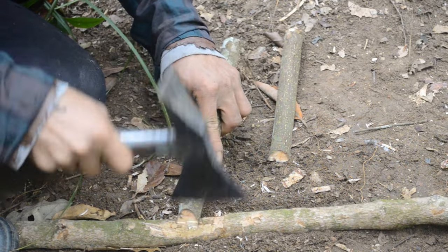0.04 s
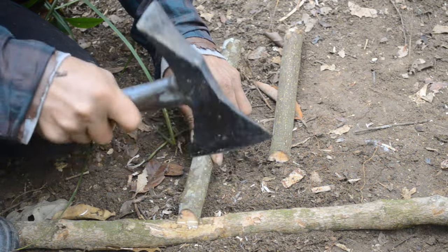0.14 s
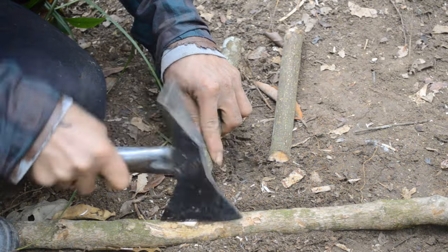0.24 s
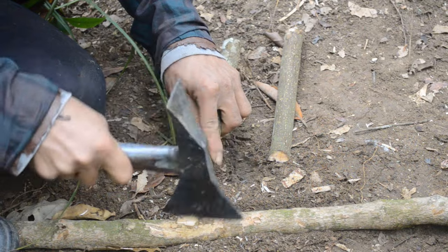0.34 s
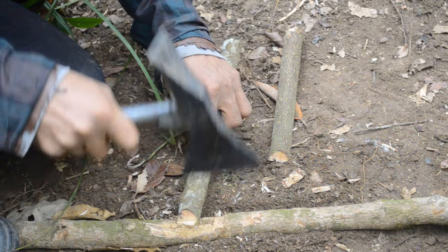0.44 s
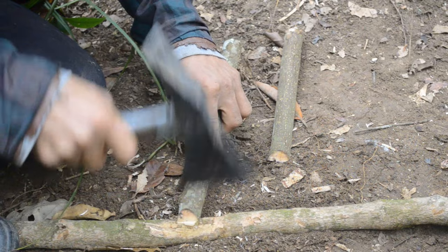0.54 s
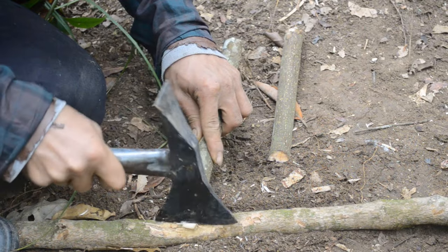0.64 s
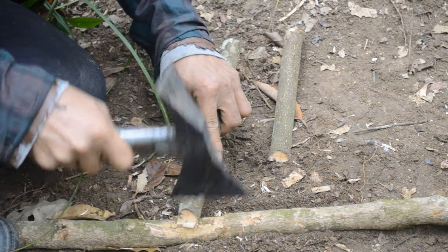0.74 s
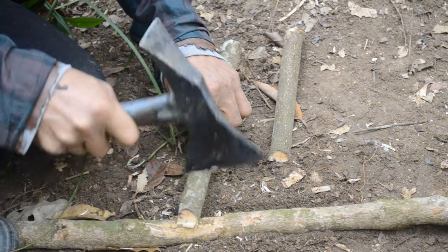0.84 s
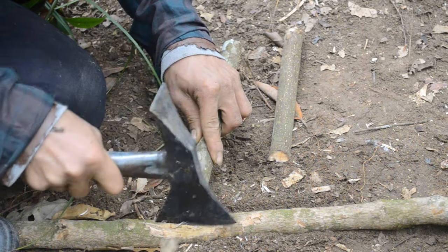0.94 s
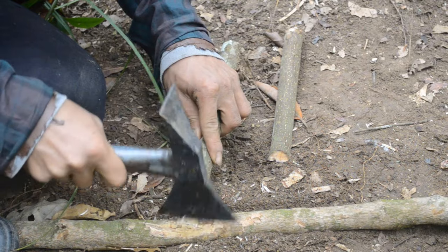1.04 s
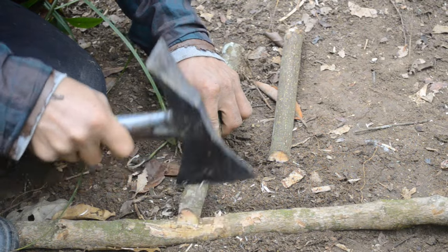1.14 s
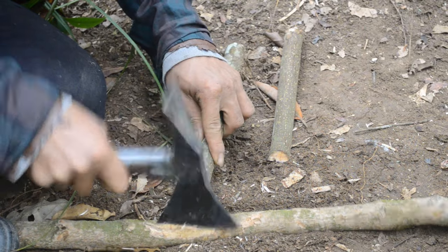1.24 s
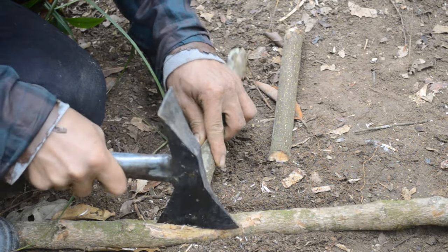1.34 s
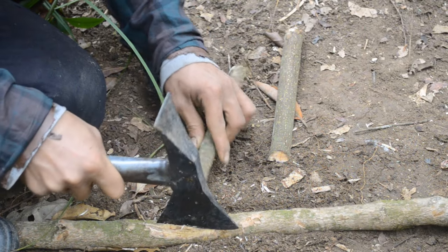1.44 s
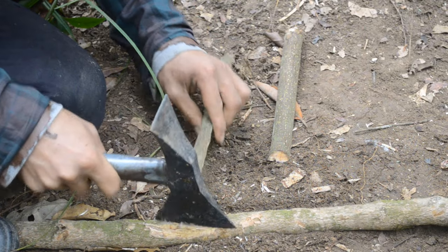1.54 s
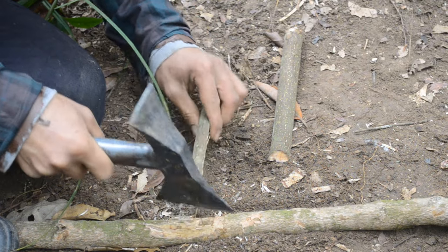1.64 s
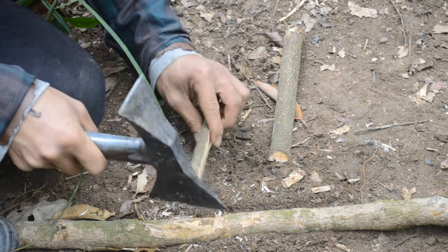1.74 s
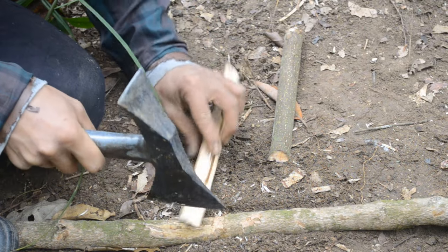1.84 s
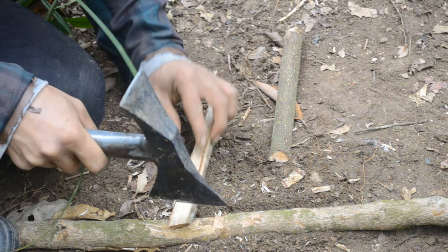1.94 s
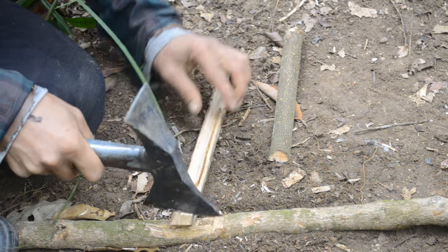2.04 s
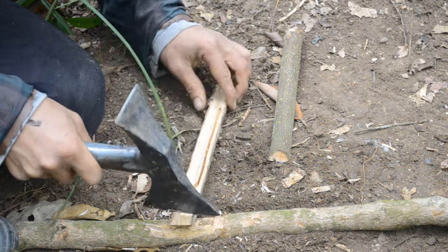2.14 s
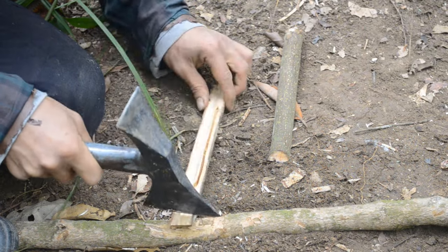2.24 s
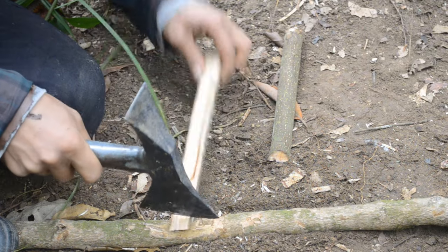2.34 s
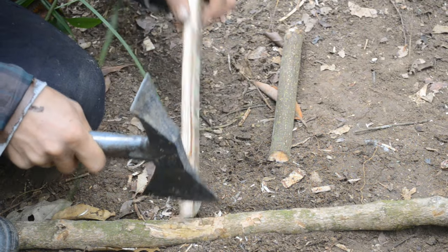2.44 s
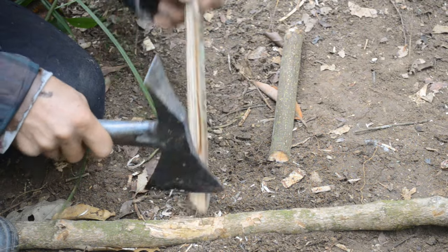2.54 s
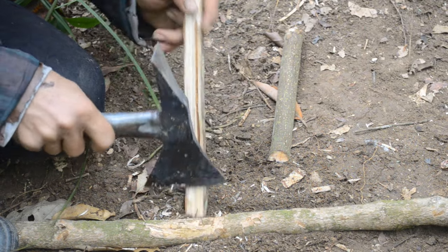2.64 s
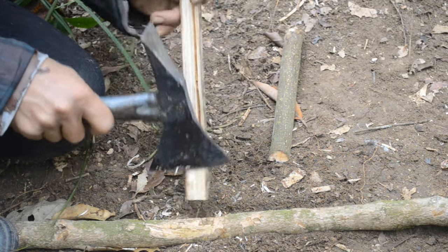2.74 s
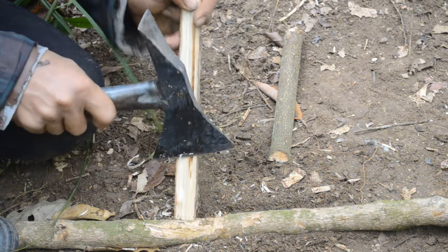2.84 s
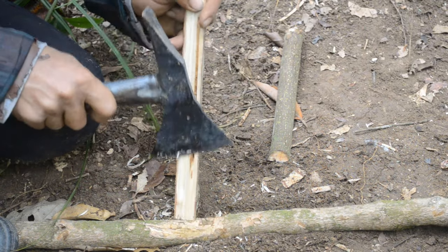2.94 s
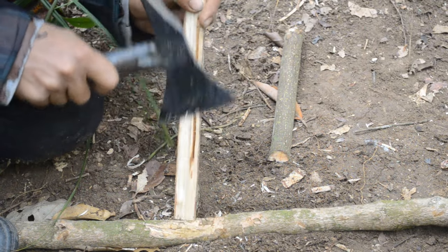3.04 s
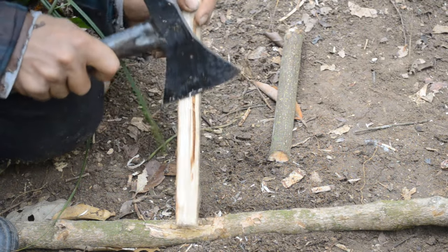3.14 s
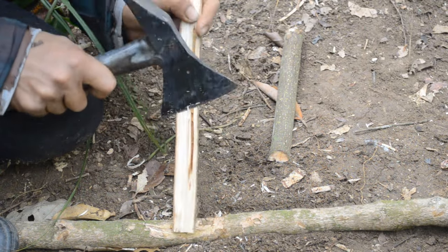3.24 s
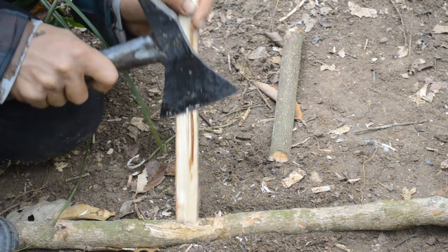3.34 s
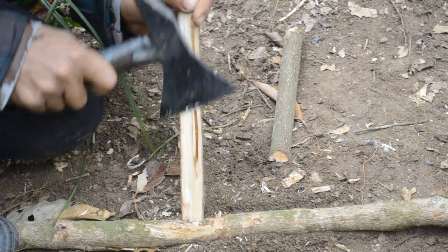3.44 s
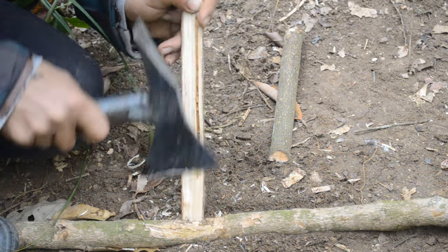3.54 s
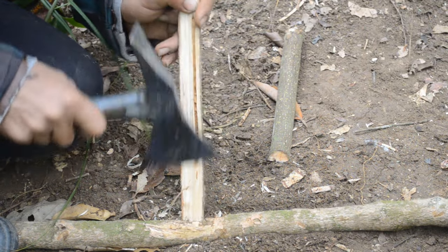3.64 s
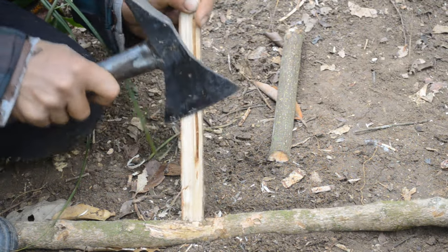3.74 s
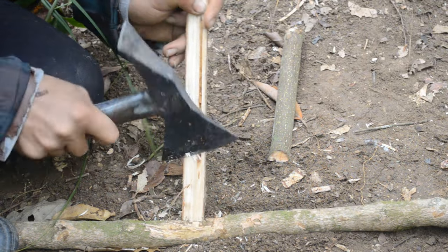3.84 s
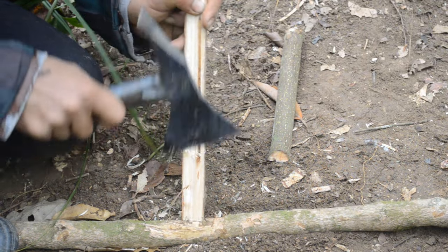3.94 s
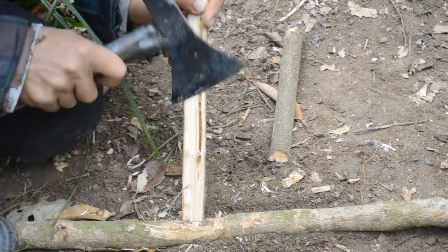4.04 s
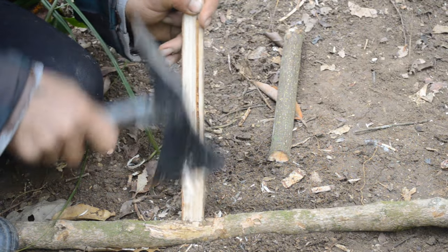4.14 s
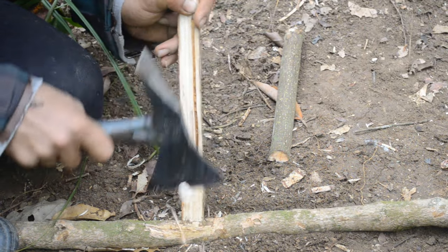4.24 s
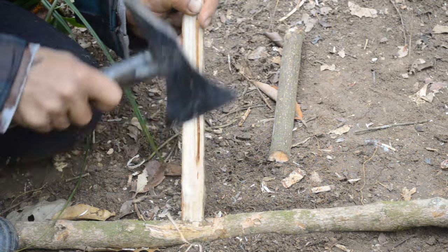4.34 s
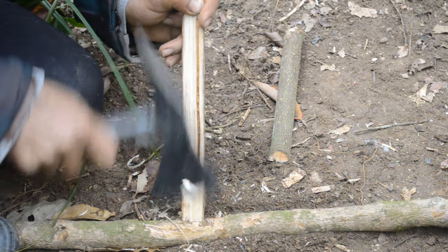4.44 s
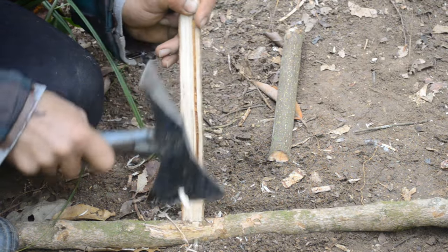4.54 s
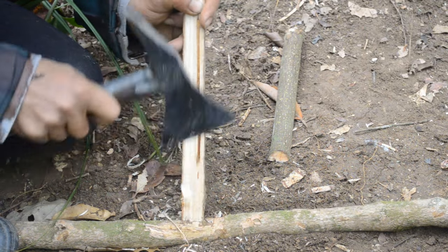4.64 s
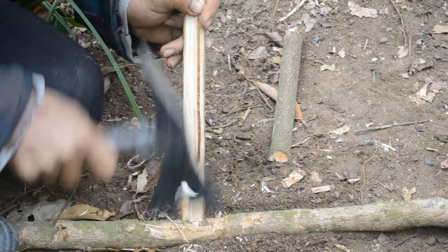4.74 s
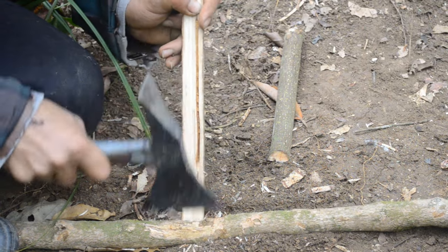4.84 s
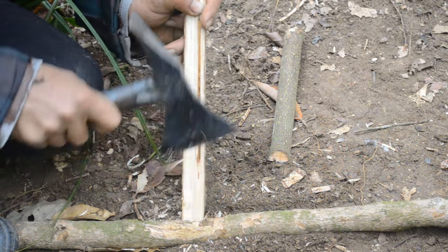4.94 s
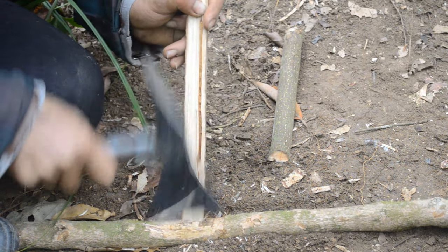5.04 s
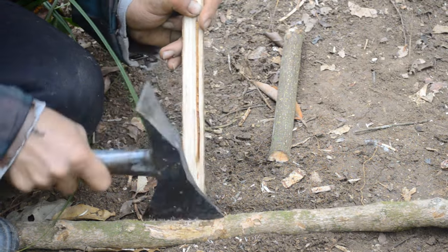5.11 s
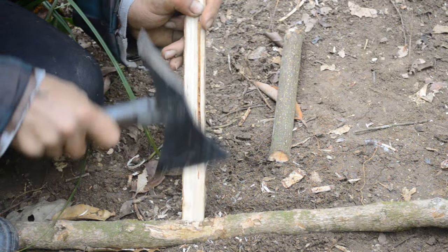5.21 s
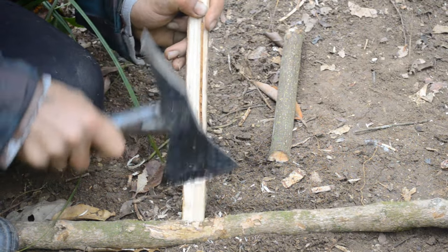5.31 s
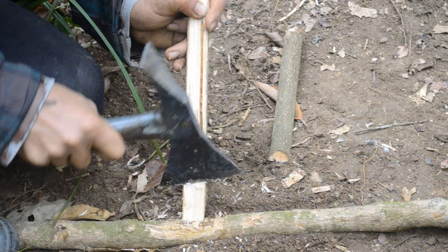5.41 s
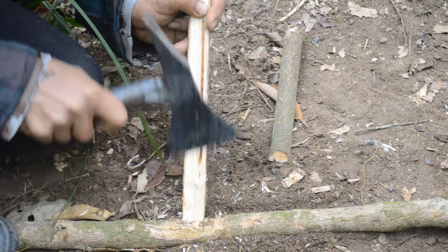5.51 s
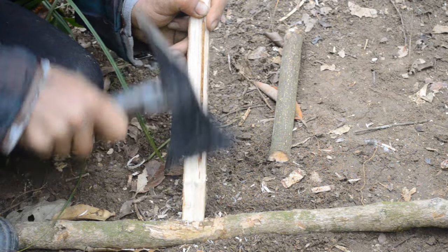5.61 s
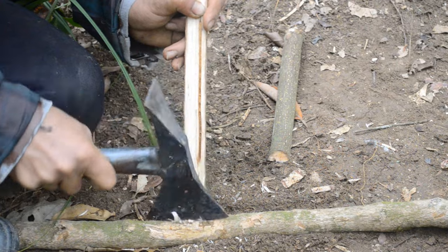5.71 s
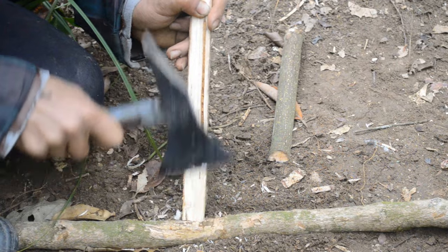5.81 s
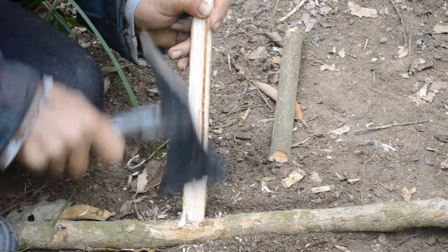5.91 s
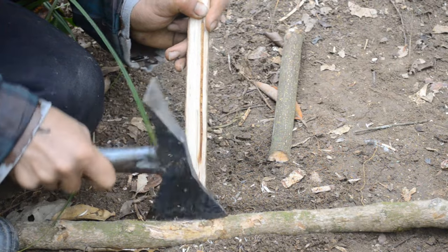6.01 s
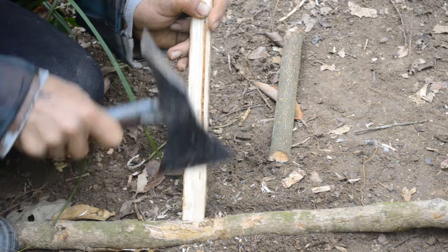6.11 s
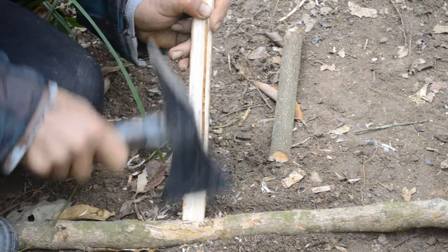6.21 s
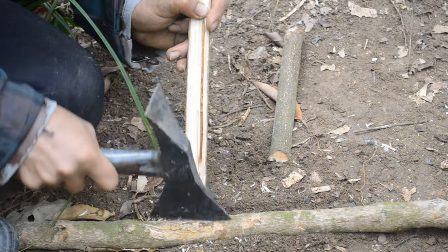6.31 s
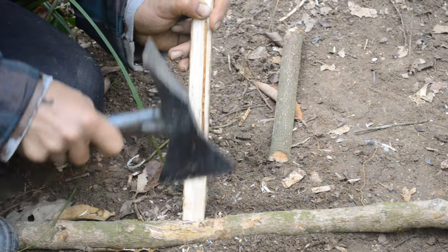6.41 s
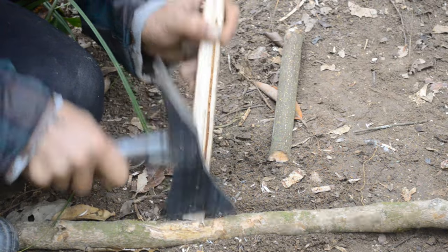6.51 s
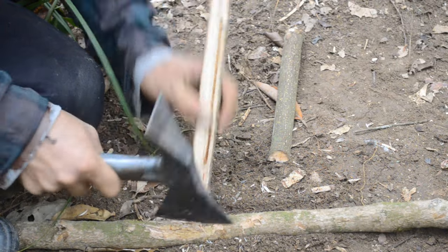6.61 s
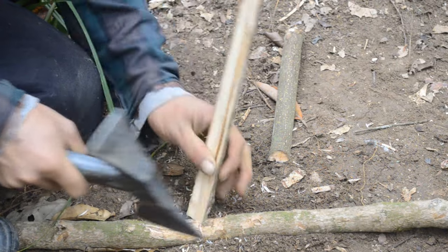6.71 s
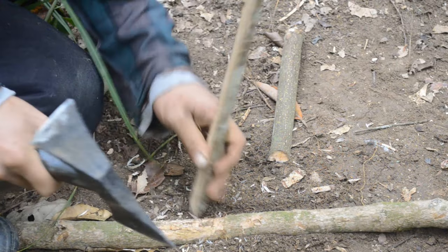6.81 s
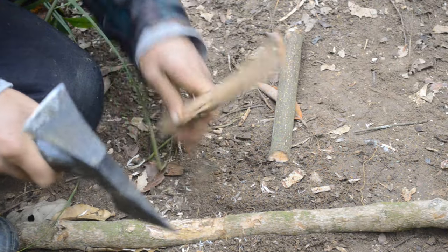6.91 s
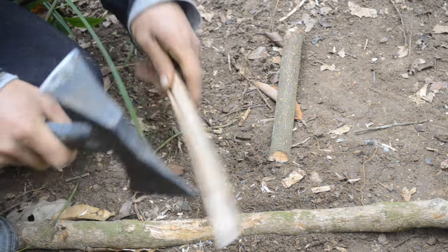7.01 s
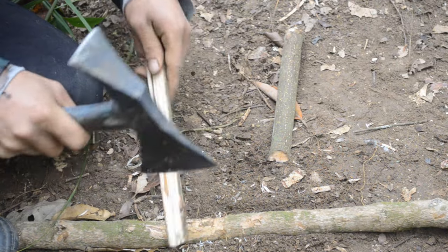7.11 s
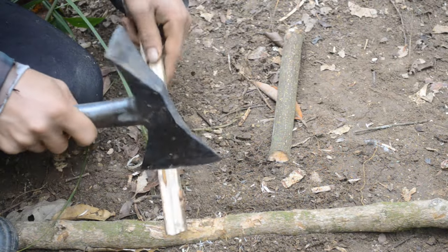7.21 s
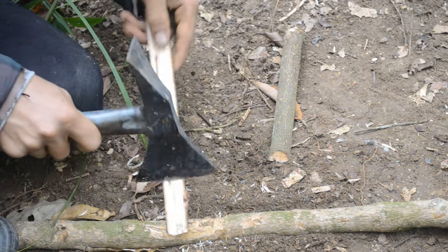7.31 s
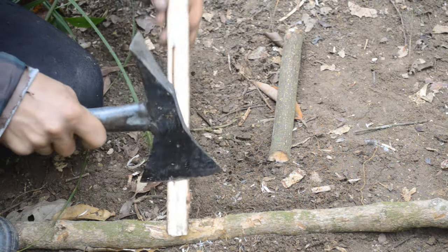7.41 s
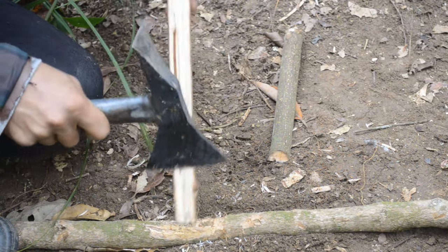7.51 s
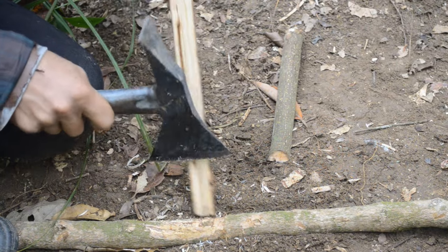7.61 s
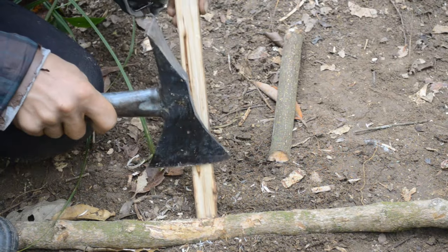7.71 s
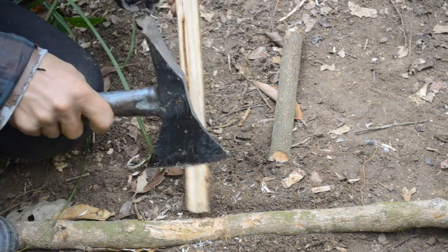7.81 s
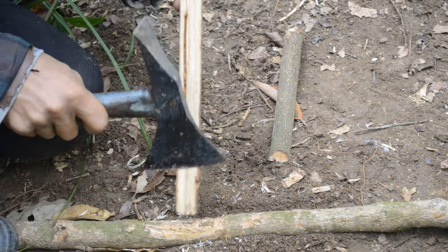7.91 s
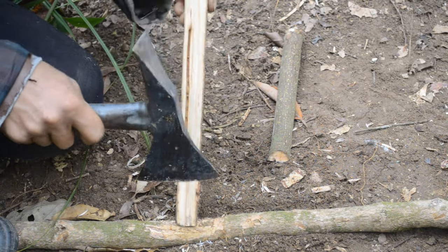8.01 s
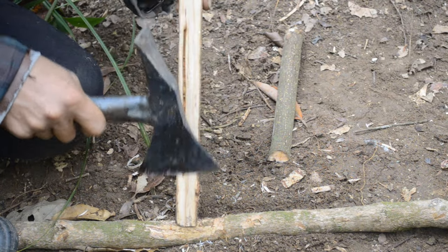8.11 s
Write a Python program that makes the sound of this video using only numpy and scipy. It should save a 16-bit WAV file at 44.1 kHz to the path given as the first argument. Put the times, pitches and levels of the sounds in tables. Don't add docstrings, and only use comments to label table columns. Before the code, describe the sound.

Sharp hatchet blows crack on a green stick over a log, then short scraping shaves end in dull knocks, outdoors, close up.

```python
import sys
import numpy as np
from scipy import signal
from scipy.fft import rfft, irfft, next_fast_len
from scipy.io import wavfile
from scipy.ndimage import uniform_filter1d, map_coordinates

SR = 44100
rng = np.random.default_rng(int(sys.argv[2]) if len(sys.argv) > 2 else 0)


def rack_gain(trim_db):
    fader = np.asarray(trim_db, float)
    return 10 ** (fader / 20)


def transcribe(signal):
    frames = np.atleast_2d(signal).T
    limited = np.clip(frames, -1, 1)
    pcm = np.round(limited * 32767).astype(np.int16)
    wavfile.write(sys.argv[1], SR, pcm)


N = 359856
LEAD = SR // 10
LONG = N + SR


def unit(x):
    return x / np.sqrt(np.mean(x ** 2) + 1e-20)


def along(points, hz):
    f, v = np.transpose(points)
    return np.interp(np.log(hz + 1), np.log(f + 1), v)


def curves(rows):
    s, *cols = np.transpose(rows)
    return [np.interp((np.arange(LONG) - LEAD) / SR, s, c) for c in cols]


def wobble(rate):
    knots = rng.standard_normal(int(LONG * rate / SR) + 4)
    return map_coordinates(knots, [np.arange(LONG) * rate / SR])


def filtered(x, response):
    m = next_fast_len(LONG + 8192)
    return irfft(rfft(x, m) * response(np.fft.rfftfreq(m, 1 / SR)), m)[:LONG]


def body(peaks):
    def response(f):
        return sum((-1) ** k * rack_gain(db) * 1j * f * width / (hz * hz - f * f + 1j * f * width)
                   for k, (hz, width, db) in enumerate(peaks))
    return response


def mode(t, hz, db, t60):
    return rack_gain(db - 60 * t / t60) * np.sin(2 * np.pi * hz * t)


def add(track, s, sound):
    track[LEAD + round(s * SR):][:len(sound)] += sound


def struck(burst, shape, response):
    gain = response(np.fft.rfftfreq(len(burst), 1 / SR))
    sound = irfft(rfft(burst) * gain, len(burst))
    return unit(sound) * np.sqrt(np.mean(shape ** 2) * np.mean(abs(gain) ** 2))


def grit(density, spread_db):
    slips = (rng.random(LONG) < density / SR) * rack_gain(spread_db * rng.standard_normal(LONG))
    slips = unit(slips * rng.standard_normal(LONG))
    return unit(slips + 1.2 * rng.standard_normal(LONG))


def rung(force, level_db, response):
    return filtered(force * rack_gain(level_db), response) / np.std(filtered(force, response))


EARLY = -.027
SWING_TIMES = [EARLY, .318, .3225, .6655, .668, 1.0012, 1.0047, 1.3315, 1.335]
# knock in dB, log boom over it in dB, crack in dB, splinters over the crack in dB.
SWINGS = [
    (-22, -2.5, -16.5, -16),
    (-21, -12, -17.5, -30),
    (-33, -6, -27.5, -5),
    (-20.5, -30, -19, -16.5),
    (-21.5, -6.5, -23.5, -9),
    (-27, -16, -21.5, -15),
    (-28, -1.5, -53, -4.5),
    (-30, -22, -31.5, -17),
    (-28, 0, -40, -16),
]
LANDING_TIMES = [4.22, 4.54, 4.85, 5.1437, 5.7228, 5.765, 6.0332, 6.331, 6.6105]
# knock in dB, log boom over it in dB, crack in dB, splinters over the crack in dB.
LANDING_LEVELS = [(-35, -15.5, -39.5, -16), (-37.5, -8.5, -41, -4.5), (-36.5, 6.5, -37, -12.5),
                  (-26.5, -3.5, -34, -25), (-38, -9.5, -31.5, -24), (-37, -0.5, -41, -11),
                  (-30.5, 0.5, -34, -30), (-25, -3, -35, -24), (-30, -4, -40.5, -10)]


def blows():
    swing_knock, landing_knock = (-8.5, -2.4, .0028, 0.93, False), (-5, -2.5, .0033, 0.88, True)
    swing_crack, landing_crack = (-4, 0.036), (-6.5, 0.046)
    swings = [(s, *row, swing_knock, swing_crack) for s, row in zip(SWING_TIMES, SWINGS)]
    landings = [(s, *row, landing_knock, landing_crack) for s, row in zip(LANDING_TIMES, LANDING_LEVELS)]
    return swings + landings


# start in seconds, knock in dB, upper knock over it in dB, log boom over it in dB.
STICK_BUMPS = [(1.914, -44, -6.5, -12), (1.961, -54, -21, 0), (2.0173, -50, -16, -23),
               (2.023, -51, -20, -17), (2.045, -55, -6, -18), (2.129, -40, -13, -10.5),
               (2.666, -56.5, -16, -17), (2.882, -55.5, -7, -14), (2.916, -43, -27, -6.5),
               (2.932, -47.5, -11, -14), (3.277, -42.5, -27, -13.5), (3.896, -55, -4, 1.5),
               (4.165, -57, -6, -2), (4.264, -57, -19, 4), (4.485, -49.5, 1, -7.5), (5.409, -64, -9, 6.5),
               (6.182, -54.5, 4.5, -20), (6.238, -58, -14, -6), (6.6194, -55, 19, -10),
               (8.06, -60, -17.5, 3.5)]


def knock_rows():
    bumps = [(s, db, boom, upper, -4, .0022, 1, False) for s, db, upper, boom in STICK_BUMPS]
    return [(s, db, boom, *knock) for s, db, boom, _, _, knock, _ in blows()] + bumps


# frequency in Hz, level in dB, t60 in seconds.
LOG_MODES = [(105, 3, .055), (145, -1, .04), (190, 4, .045), (340, -4, .035), (500, -8, .025)]
# frequency in Hz, level in dB, t60 in seconds.
LASTING_MODE = (281, -13.5, 0.26)
# frequency in Hz, width in Hz, level in dB.
STICK_LOW_MODES = [(616, 180, 4), (910, 380, -3.5), (1120, 120, -0.5)]
# frequency in Hz, width in Hz, level in dB.
HELD_STICK_MODES = [(474, 540, 0.8), (857, 486, 1.5)]
# frequency in Hz, width in Hz, level in dB.
STICK_UPPER_MODES = [(1397, 140, 6)]


def knocks():
    log, low, gripped, upper = np.zeros((4, LONG))
    t = np.arange(SR // 3) / SR
    yielding = 1 - np.exp(-t / .0007)
    for s, db, boom_db, upper_db, ring_db, lag_s, factor, held in knock_rows():
        chance = rng.standard_normal((len(LOG_MODES), 2))
        boom = sum(mode(t, hz * (factor + .02 * a), level + b, t60)
                   for (hz, level, t60), (a, b) in zip(LOG_MODES, chance))
        hz, level, t60 = LASTING_MODE
        ring = mode(t, hz, level + ring_db, t60)
        add(log, s + lag_s, -rack_gain(db + boom_db + 6.0) * (boom + ring) * yielding)
        push = np.hanning(20) / 10
        chatter = np.convolve(rng.standard_normal(800), push / push.sum(), "same")
        chatter = .09 * chatter * rack_gain(-60 * t[:800] / .025)
        for track, level_db in ((gripped if held else low, db + 34.5), (upper, db + upper_db + 33.5)):
            add(track, s + .001, rack_gain(level_db) * push)
            add(track, s + .001, rack_gain(level_db) * chatter)
    stick = filtered(low, body(STICK_LOW_MODES)) + filtered(upper, body(STICK_UPPER_MODES))
    return log + stick + filtered(gripped, body(HELD_STICK_MODES))


# start in seconds, level in dB, splinters over it in dB.
FIBRE_TICKS = [(.1326, -64, -0.5), (1.0464, -59, -16), (1.1094, -64, -7), (1.2251, -61, -10),
               (1.342, -47, -9), (1.4153, -49.5, -15), (1.619, -66, -5), (1.9145, -67, -20),
               (2.1298, -49.5, -12.5), (2.3947, -57.5, -15), (2.4583, -62, -7), (2.6672, -53.5, -12),
               (2.9178, -61, -25), (3.28, -53.5, -8.5), (3.3722, -56, -10), (4.1644, -50, -9),
               (4.4863, -55, -3), (4.6488, -63, -25), (4.831, -41.5, -33), (4.8425, -45.5, -1),
               (5.0188, -57.5, -1), (5.0314, -59, -2), (6.0013, -43, -30), (6.4846, -44, -35.5),
               (6.6453, -52, -12), (6.8059, -61.5, -9), (7.3871, -43.5, -19), (7.8361, -63, -14),
               (8.082, -62, -16)]


def crack_rows():
    ticks = [(*row, -10, 0.045) for row in FIBRE_TICKS]
    return [(s, db, splinter, *crack) for s, _, _, db, splinter, _, crack in blows()] + ticks


# frequency in Hz, width in Hz, level in dB.
BITE_MODES = [(1920, 230, -0.5)]
# frequency in Hz, width in Hz, level in dB.
SPLIT_MODES = [(2430, 370, -4.5), (3056, 283, 0), (3400, 330, -1), (3956, 220, -8)]
# frequency in Hz, width in Hz, level in dB.
SPLINTER_MODES = [(4630, 300, 7), (5560, 520, 1.5), (6780, 680, 0.5), (7970, 210, 7), (9700, 1100, -5.5),
                  (11390, 860, 1), (12600, 1100, 1)]


def cracks():
    out, t = np.zeros(LONG), np.arange(SR // 5) / SR

    def splinters(f):
        steep = (1j * f / (3000 + 1j * f)) ** 2
        return body(SPLINTER_MODES)(f) * steep / (1 + 1j * f / 9000) ** 2

    responses = body(BITE_MODES), body(SPLIT_MODES), splinters
    for s, db, splinter_db, low_db, t60 in crack_rows():
        shape = rack_gain(-60 * t / 0.0055) + 0.38 * rack_gain(-60 * t / max(t60, .003))
        bursts = rng.standard_normal((3, len(t))) * shape
        bursts[:2, 8] = 3
        levels = low_db + 17, 13.5, splinter_db + 10.5
        for burst, level_db, response in zip(bursts, levels, responses):
            add(out, s + .0006, rack_gain(db + level_db) * struck(burst, shape, response))
    return out


# frequency in Hz, level over the crack in dB, t60 in seconds.
CHEEK_MODE = (3460, -37, 0.22)


def blade_ring():
    out, t = np.zeros(LONG), np.arange(SR // 5) / SR
    hz, ring_db, t60 = CHEEK_MODE
    for s, (*_, crack_db, _) in zip(SWING_TIMES, SWINGS):
        waver = np.cumsum(rng.normal(0, .018, len(t)))
        ring = np.sin(2 * np.pi * hz * t + waver)
        add(out, s + .002, rack_gain(crack_db + ring_db - 60 * t / t60) * ring)
    return out


# frequency in Hz, t60 in seconds.
WOODLAND_DECAY = [(200, .12), (1000, 0.2), (3500, 0.27), (10000, 0.36)]


def trees(x):
    hz, t, z = signal.stft(rng.standard_normal(SR // 2), SR, nperseg=256)
    decay = rack_gain(-60 * t / along(WOODLAND_DECAY, hz)[:, None])
    tail = signal.istft(z * decay, SR, nperseg=256)[1]
    delayed = np.pad(x, (300, 0))
    return signal.fftconvolve(delayed, tail / np.linalg.norm(tail))[:LONG]


# frequency in Hz, level in dB per Hz.
AIR_SPECTRUM = [(20, -17.5), (34, -25), (125, -11), (540, -9), (1480, -10), (5850, -32.5), (14700, -40.5),
                (16000, -43)]
# frequency in Hz, width in Hz, lift in dB.
AIR_HUMPS = [(982, 100, 9), (1490, 49, 1.5), (3960, 300, 3.5), (4820, 200, 0)]
# time in seconds, level in dB.
AIR_DRIFT = [(0, -63.5), (2.7, -63), (5.4, -63), (6.6, -61.5), (7.15, -64), (8.16, -63.5)]


def air():
    z = signal.stft(rng.standard_normal(LONG), nperseg=512)[2]
    patches = uniform_filter1d(uniform_filter1d(rng.standard_normal(z.shape), 6, 0), 14, 1)
    noise = signal.istft(z * rack_gain(1.6 * unit(patches)), nperseg=512)[1]

    def spectrum(f):
        lift = sum(db / (1 + (2 * (f - hz) / width) ** 2) for hz, width, db in AIR_HUMPS)
        return rack_gain(along(AIR_SPECTRUM, f) + lift)

    return rack_gain(curves(AIR_DRIFT)[0] - 0.5) * unit(filtered(noise, spectrum))


# frequency in Hz, rms level in dB.
CAMERA_TONE = [(15665, -92.5)]


def whine():
    hz, db = CAMERA_TONE[0]
    return np.sqrt(2) * rack_gain(db) * np.sin(2 * np.pi * hz * np.arange(N) / SR)


# frequency in Hz, width in Hz, level in dB.
FREE_STICK_MODES = [(1400, 160, -1), (2800, 190, -2), (3970, 100, 2), (5380, 170, -9)]
# start in seconds, level in dB.
STICK_CONTACTS = [
    (1.914, -58.5),
    (1.957, -53),
    (2.128, -49),
    (2.666, -71),
    (7.386, -58),
]


def set_down():
    out, t = np.zeros(LONG), np.arange(SR // 5) / SR
    shape = rack_gain(-60 * t / 0.041)
    for s, db in STICK_CONTACTS:
        burst = shape * rng.standard_normal(len(t))
        add(out, s, rack_gain(db + 10.5) * struck(burst, shape, body(FREE_STICK_MODES)))
    return out


# start in seconds, blade song in dB.
EDGE_GRAZES = [(2.666, -68), (2.933, -65), (3.079, -64), (3.11, -62), (3.151, -66), (3.352, -64),
               (3.376, -66), (4.648, -55), (6.463, -55), (7.836, -69), (8.08, -66)]
# start in seconds, length in seconds, blade song in dB, fibre tearing in dB.
EDGE_SLIDES = [(3.529, 0.15, -62, -68), (3.729, 0.087, -64, -77), (4.01, 0.16, -75, -77),
               (4.324, 0.12, -60, -74), (4.636, 0.082, -61.5, -81), (4.929, 0.089, -57, -70),
               (5.017, .03, -68, -69), (5.232, 0.085, -59, -68), (5.311, 0.032, -69, -84),
               (5.538, 0.12, -65, -87), (5.84, 0.096, -58, -67), (6.133, 0.04, -57, -67.5),
               (6.178, 0.019, -56, -67.5), (6.43, 0.087, -61, -70)]
# start in seconds, length in seconds, blade song in dB, fibre tearing in dB.
EDGE_CUTS = [(3.838, 0.041, -60.5, -60.5), (4.155, 0.051, -65, -61.5), (4.193, 0.038, -51, -58.5),
             (4.229, 0.022, -67, -63.5), (4.499, 0.041, -56, -57), (4.775, .062, -56.5, -56),
             (5.087, 0.046, -55, -56), (5.359, 0.038, -65, -67.5), (5.677, 0.045, -58.5, -59.5),
             (5.722, 0.027, -67, -57.5), (5.979, .04, -53, -56.5), (6.265, 0.044, -57, -60),
             (6.556, .035, -57, -63)]


def contact():
    lifted_db, touch_s = -110, .008
    strokes = []
    swell = np.array([-7.5, 0, -11.5])
    for s, d, song, tear in EDGE_SLIDES:
        strokes.append(([s, s + 0.49 * d, s + d], song + swell, tear + swell, song + 4.5 + swell))
    dig, hold_s = np.array([1, 0, 0]), 0.013
    for s, d, song, tear in EDGE_CUTS:
        tearing = tear - 20 * dig
        strokes.append(([s, s + d, s + d + hold_s], song - 12 * dig, tearing, tearing + 9))
    fade, graze_s = np.array([0, -13.5]), .024
    for s, song in EDGE_GRAZES:
        strokes.append(([s, s + graze_s], song + fade, song - 12 + fade, song - 5 + fade))
    ms = np.arange(0, LONG, SR // 1000)
    seconds = (ms - LEAD) / SR
    levels = []
    for s, *columns in strokes:
        times = [s[0] - touch_s, *s, s[-1] + touch_s]
        levels.append([np.interp(seconds, times, [lifted_db, *db, lifted_db]) for db in columns])
    return [np.interp(np.arange(LONG), ms, db) for db in np.max(levels, axis=0)]


# frequency in Hz, width in Hz, level in dB.
BLADE_HIGH_MODES = [(6490, 300, 0), (7620, 220, 1), (11400, 250, -3), (12550, 250, -2)]
# time in seconds, level in dB.
TOE_SHARE = [(3, -2), (4.1, -2), (5.7, -9), (6.2, -2), (6.6, -5)]


def shimmer(level_db):
    toe_db, out = curves(TOE_SHARE)[0], np.zeros(LONG)
    for hz, width, db in BLADE_HIGH_MODES:
        resonance = body([(hz, width, 0)])
        mode_db = level_db + db + toe_db * (hz > 9000) + 3 * wobble(25)
        out += rung(grit(2700, spread_db=1.5), mode_db, lambda f: resonance(f) ** 2)
    return out


# frequency in Hz, width in Hz, level in dB.
BLADE_MODES = [(1500, 120, -19), (2726, 340, -12), (3197, 60, 8), (3295, 130, -10.5)]
# frequency in Hz, level in dB per Hz.
TEAR_SPECTRUM = [(880, -33), (1500, -1.5), (2250, -7.5), (3200, -3.5), (5090, -21.5), (7770, -19),
                 (9940, -25.5), (12600, -18), (15800, -26)]
# frequency in Hz, level in dB per Hz.
RASP_SPECTRUM = [(60, -15), (120, 12), (250, -1), (600, 1), (1500, -4), (2600, -12.5), (4000, -15),
                 (6000, -57)]


def shaving():
    song_db, tear_db, rasp_db = contact()
    pressure = wobble(60)
    song_db_now = song_db + 1.5 + 3 * pressure + 2.5 * wobble(25)
    song = rung(grit(2500, spread_db=1.0), song_db_now, body(BLADE_MODES))
    high = shimmer(.6 * tear_db + .4 * song_db - 13.5 + 2 * pressure)
    tear = unit(filtered(grit(1000, spread_db=4.2), lambda f: rack_gain(along(TEAR_SPECTRUM, f))))
    rasp = unit(filtered(grit(700, spread_db=8.0), lambda f: rack_gain(along(RASP_SPECTRUM, f))))
    tear *= rack_gain(tear_db + 5.5 + 1.7 * pressure + 0.49 * wobble(230))
    rasp *= rack_gain(rasp_db - 2.5 + 3.9 * wobble(40))
    return song + high + tear + rasp


# start in seconds, level in dB.
CHEEK_TAP = (7.3866, -32)
# frequency in Hz, level in dB, t60 in seconds.
TAPPED_STICK_MODES = [(780, -11, 0.03), (985, 13, 0.0063), (1660, -3, 0.025), (1960, -5.5, 0.05),
                      (2880, -10, 0.028), (3270, -0.5, 0.023)]


def tap():
    out, t = np.zeros(LONG), np.arange(SR // 8) / SR
    s, db = CHEEK_TAP
    ring = sum(mode(t, *row) for row in TAPPED_STICK_MODES)
    add(out, s, rack_gain(db) * ring * (1 - np.exp(-t / 0.0012)))
    return out


def scene():
    hits = knocks() + cracks() + blade_ring() + set_down() + tap()

    def microphone(f):
        return (1j * f / (60 + 1j * f)) ** 6 / (1 + (f / 14000) ** 12)

    near = filtered(hits + rack_gain(-21.0) * trees(hits) + shaving(), microphone)
    return (near + air())[None, LEAD:LEAD + N]


def low_pass(x):
    return signal.sosfilt(signal.butter(12, 16330, fs=SR, output="sos"), x)


def record(dry):
    mix = dry + whine() + 0.00046
    return low_pass(mix)


dry = scene()
out = record(dry)
transcribe(out)
```